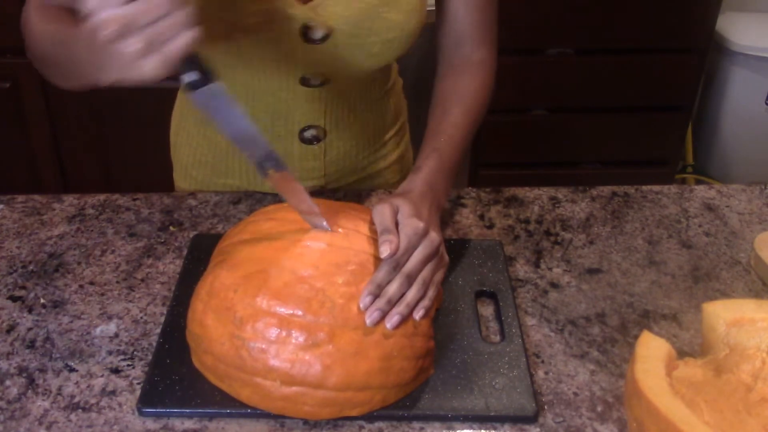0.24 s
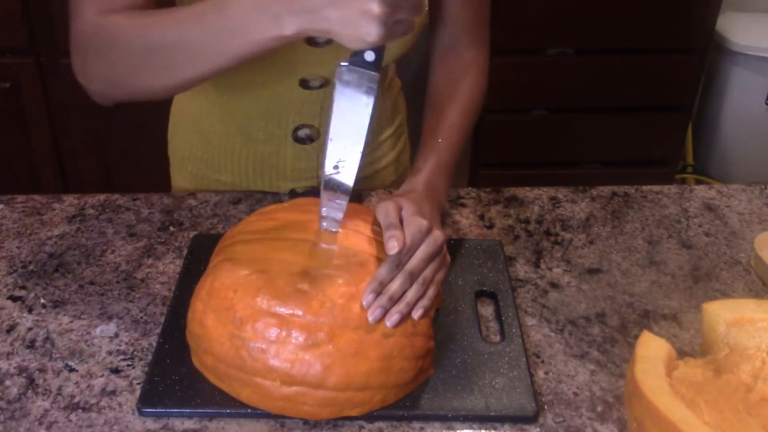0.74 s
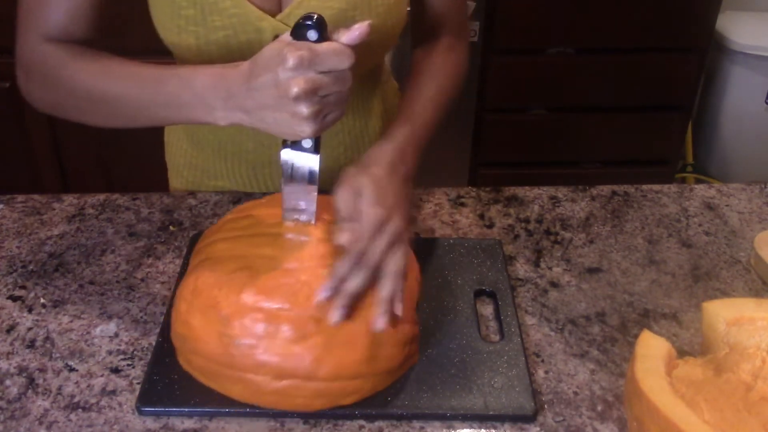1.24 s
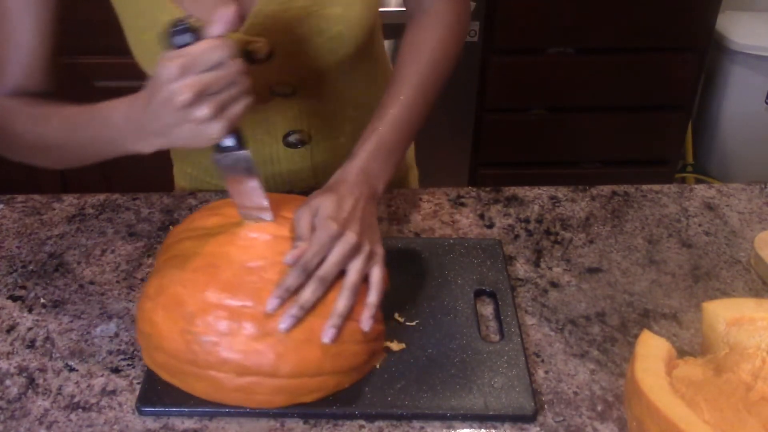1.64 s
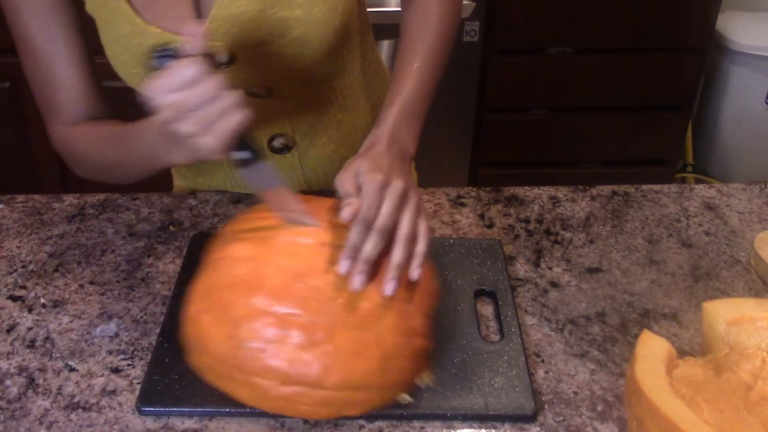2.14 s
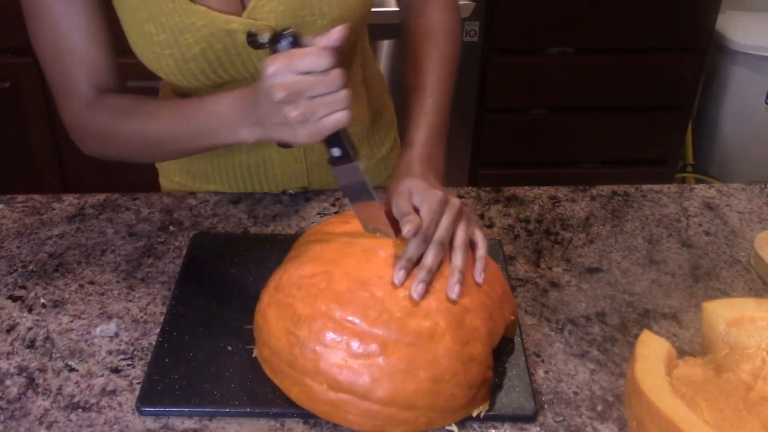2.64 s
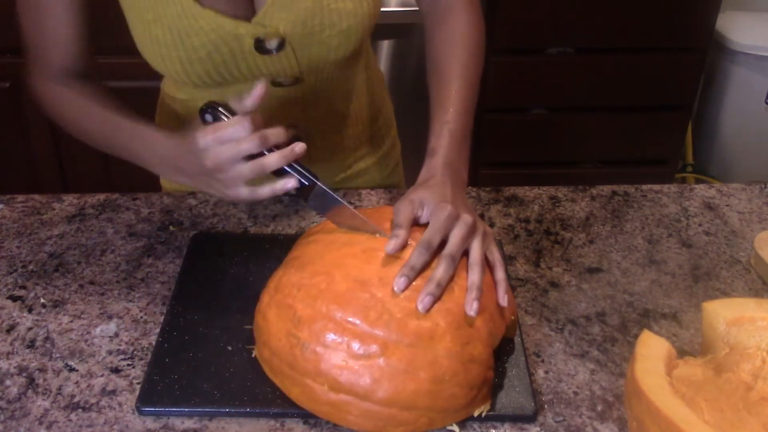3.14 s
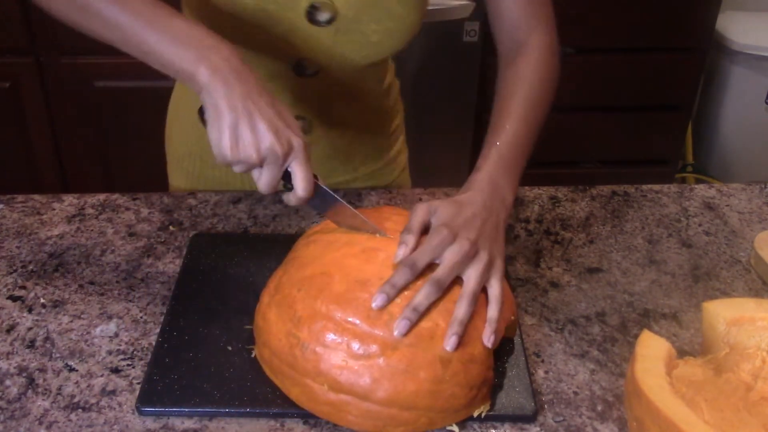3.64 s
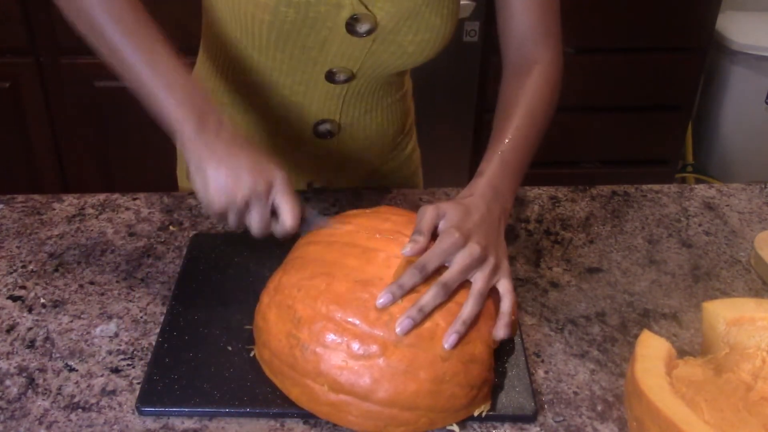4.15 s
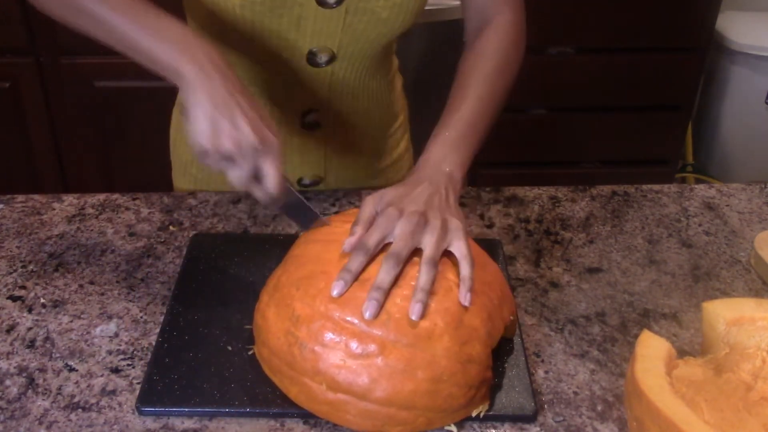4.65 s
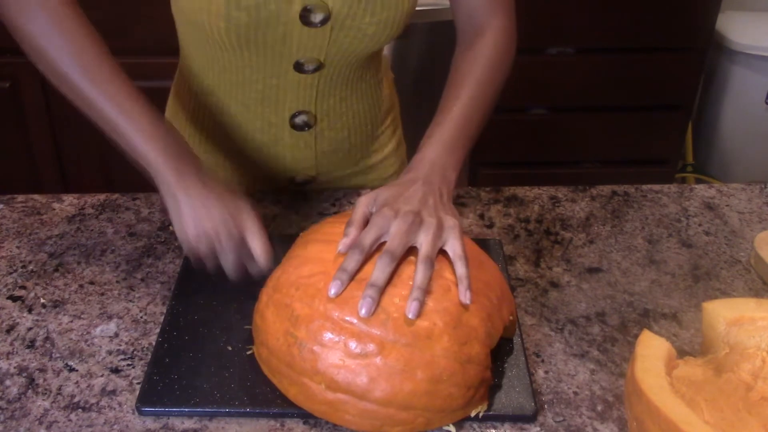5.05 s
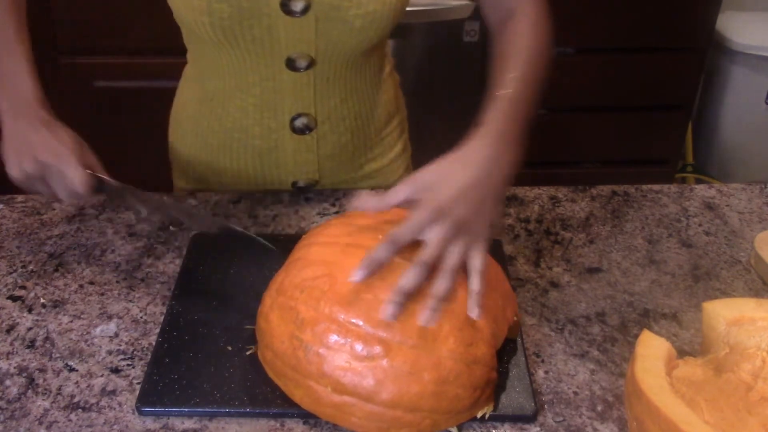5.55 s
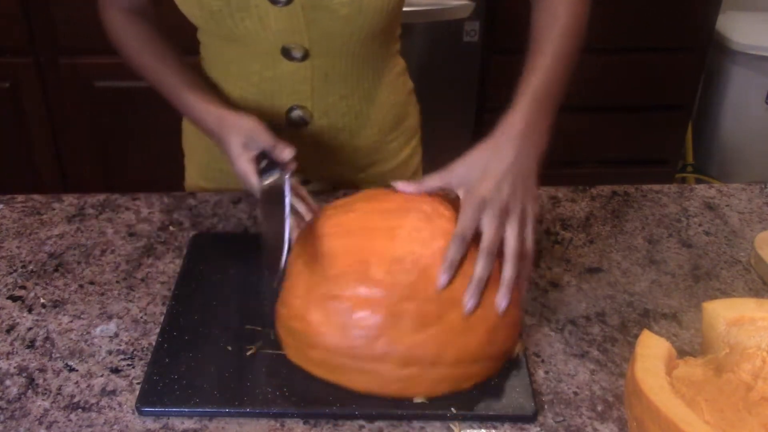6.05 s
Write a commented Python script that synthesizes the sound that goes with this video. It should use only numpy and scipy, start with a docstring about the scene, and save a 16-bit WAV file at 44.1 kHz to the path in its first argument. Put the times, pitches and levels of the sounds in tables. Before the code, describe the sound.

A large pumpkin is cut on a plastic board, heard close with short room echoes. Most strokes are faint, gritty crunches with low hollow rumbles and dry snaps. Three abrupt impacts stand far above them: a splitting thud early on, a clacky board knock past the middle, and a very loud bright crack shortly after. Gentle bumps, rubbing and a tip scrape fill the gaps over faint hum.

```python
"""Knife through a raw pumpkin

Close up in a kitchen, a chef's knife is forced through a raw pumpkin on a plastic board. Streams of random
grains make the flesh crunch and the slides rub; coloured noise bursts make fibres snap and rind crack.
Decaying sines ring the hollow shell, the knife on the board and the blade; one gliding tone squeaks.
Noise echoes and standing waves form the room, over air and hum; a limiter ducks the loudest hits."""
import sys
import numpy as np
from scipy import signal
from scipy.fft import rfft, irfft, next_fast_len
from scipy.io import wavfile

SR = 44100
rng = np.random.default_rng(int(sys.argv[2]) if len(sys.argv) > 2 else 0)


def transcribe(signal):
    """Save signal, clipped to [-1, 1], as a 16-bit WAV file at the path in sys.argv[1]."""
    frames = np.atleast_2d(signal).T
    limited = np.clip(frames, -1, 1)
    pcm = np.round(limited * 32767).astype(np.int16)
    wavfile.write(sys.argv[1], SR, pcm)


N = 277389
TIME = np.arange(N) / SR  # seconds

# Levels in all tables are those ahead of the echoes and the limiter.
# blade worked through the flesh: start t/s, end t/s, crunch level/dB, shell rumble level/dB
CUT_STROKES = [(0.02, 0.28, -49.5, -46.5), (0.43, 0.61, -57, -52), (0.93, 1.0, -54, -49.5),
               (1.42, 1.59, -56.5, -45.5), (1.61, 1.76, -50, -41.5), (2.62, 2.78, -53, -53),
               (2.80, 2.94, -48.5, -48), (3.15, 3.50, -69.5, -64.5), (3.73, 3.93, -58, -62),
               (3.95, 4.04, -49, -56), (4.14, 4.28, -59.5, -52), (4.88, 4.97, -50, -44.5),
               (5.40, 5.46, -51.5, -71)]
# rind gives way and the blade shoots forward: start t/s, end t/s, crunch level/dB, shell rumble level/dB
BLADE_LUNGES = [(0.789, 0.831, -36, -37.5), (4.063, 4.104, -30, -36.5), (4.984, 4.988, -23, -27)]
# pumpkin slid on the board: start t/s, end t/s, rubbing level/dB, shell rumble level/dB
PUMPKIN_SLIDES = [(1.95, 2.14, -47.5, -46), (2.16, 2.22, -43.5, -43), (3.45, 3.49, -60, -64),
                  (5.82, 6.02, -52.5, -49.5), (6.06, 6.29, -49.5, -51)]
# knife tip dragged over the board: start t/s, end t/s, level/dB
TIP_DRAG = (5.295, 5.336, -30)
# wet rind squeaking on steel in the first lunge: start t/s, end t/s, level/dB of the fundamental
RIND_SQUEAK = (0.808, 0.823, -34)
# knife hits the board: t/s, ring level/dB, splitting rind level/dB, lowpass f/Hz, shell thump level/dB,
# thump pitch f/Hz
BOARD_BLOWS = [(0.8329, -16, 5, 1896, -2.5, 281), (4.5043, -9.5, -15.5, 3340, -20.5, 268),
               (4.9872, -3.5, 5.5, 7550, -4, 343)]
# soft knocks on the shell: t/s, relative level/dB, contact click level/dB against the knock, pitch f/Hz
SHELL_KNOCKS = [(0.8627, -10.5, -20, 276), (0.879, -7, -20, 280), (1.25, -6.5, -17, 319),
                (1.274, -15, -20, 255), (1.596, -26.5, -22, 300), (1.667, -11.5, -15, 312),
                (1.729, -23.5, -5, 277), (2.154, -11.5, -7.5, 270), (2.169, -13, -33, 285),
                (3.167, -35, -20.5, 330), (3.821, -23, -40, 290), (4.087, -13, -40, 293),
                (4.273, -26, -5, 335), (4.414, -22, -40, 361), (4.426, -24.5, -37, 350),
                (4.446, -29, -35, 356), (5.397, -26, -13, 357), (5.622, -34, -31.5, 271.6),
                (5.817, -29.5, -36, 350), (6.063, -31.5, -11, 364)]
# loudest fibres snapping: t/s, relative level/dB, dull body level/dB against the snap
FIBRE_SNAPS = [(0.038, -30, -4), (0.076, -32.5, 4.5), (0.2648, -29, -3.5), (1.5937, -21, -38),
               (1.6522, -35, -8), (1.669, -33.5, 11), (1.7288, -31.5, 8), (1.7463, -30, -7),
               (2.1547, -39.5, 14), (2.209, -41.5, 10.5), (2.792, -27, 1), (2.8633, -29.5, -1.5),
               (2.898, -33, 6), (2.9097, -29.5, 0), (2.93, -32.5, 0), (3.8, -32.5, 6), (3.817, -25.5, -2),
               (4.061, -24, -18), (4.2714, -33.5, -11.5), (4.422, -34, -3), (5.456, -31.5, -2)]
# light pings of the blade: t/s, peak level/dB before decay
BLADE_PINGS = [(1.944, -42.5), (2.654, -41)]

# modes of the hollow shell (knocks shift the pitch): f/Hz, relative level/dB, t60/s
SHELL_MODES = [(168.4, -15, 0.0075), (225.7, -1, 0.022), (307.2, 12, 0.023), (365, -14, 0.01),
               (487, -8, 0.022)]
# modes of the knife on the board: f/Hz, relative level/dB, t60/s
BOARD_MODES = [(486, -8.5, 0.028), (614, -8.5, 0.051), (772, -9, 0.027), (1146, -19.5, 0.056),
               (1697, 0, 0.023), (1867, -1, 0.02), (2196, -8.5, 0.025), (3107, -5, 0.026),
               (3450, -3, 0.018), (4900, -26.5, 0.0093), (5830, -5.5, 0.014), (7340, -8, 0.01)]
# mode of the buried blade: f/Hz, relative level/dB, t60/s
SINGING_MODE = (3045, 0, 0.04)
# modes of the blade's heel tapping the rind: f/Hz, relative level/dB, t60/s
HEEL_MODES = [(565, -2.5, 0.025), (710, 2, 0.018), (1120, -0.5, 0.051), (2490, 0, 0.0093)]
# standing waves of the kitchen: f/Hz, level/dB, t60/s
ROOM_MODES = [(222, -64, .3), (289, -58, .42), (354, -55, .45), (398, -62, .35)]

# flesh tearing along the blade: f/Hz, relative level/dB per Hz
CRUNCH_SPECTRUM = [(150, -12.5), (500, 14), (1200, 2), (1700, 0), (3000, 0), (5000, -3), (8000, -1.5),
                   (10500, -7.5), (15000, -11)]
# cracking rind and flesh: f/Hz, relative level/dB per Hz
SPLIT_SPECTRUM = [(60, -38), (160, -19.5), (270, 8.5), (400, 5), (600, -8), (880, -2), (1100, -2.5),
                  (1500, 0.5), (2300, -0.5), (4000, -3), (8000, -7), (10500, -16), (15000, -24)]
# dry tick of a single fibre: f/Hz, relative level/dB per Hz
TICK_SPECTRUM = [(500, 0.5), (2000, -3.5), (5000, 4), (9000, 8), (12000, 0.5), (15000, -4)]
# pumpkin rubbing on the board: f/Hz, relative level/dB per Hz
SLIDE_SPECTRUM = [(150, -2), (500, 6), (1100, 3), (2100, 2), (3500, -7), (5500, -11), (8000, -8.5),
                  (11000, -19.5), (15000, -21)]
# tip scraping the board: f/Hz, relative level/dB per Hz
SCRAPE_SPECTRUM = [(260, -37), (450, -16), (699, -9), (871, 3.5), (1010, -3.5), (1390, 3.5), (1760, -2.5),
                   (1980, -8.5), (2500, -2), (3120, -15), (5870, -23), (15000, -37.5)]
# tone of the echoes: f/Hz, relative level/dB
ECHO_SPECTRUM = [(60, -1), (130, -11.5), (220, -4.5), (350, 2), (550, -3), (900, -6.5), (2000, -7.5),
                 (4000, -5.5), (7000, -11.5), (10000, -11.5), (15000, -8)]
# how much the two channels differ on the echoes: f/Hz, side level/dB
ECHO_WIDTH = [(60, -34.5), (250, -33), (1000, -28), (4000, -14.5), (8000, -21), (15000, -1)]
# kitchen reverberation: f/Hz, t60/s
ECHO_DECAY = [(150, 0.43), (400, 0.23), (1000, 0.48), (2800, 0.33), (7000, 0.37), (14000, 0.25)]
# room air: f/Hz, relative level/dB per Hz
AIR_SPECTRUM = [(25, 6), (60, -8.5), (130, -8), (250, -7), (430, -2), (650, -10.5), (870, -16.5),
                (1380, -18.5), (3500, -25), (8000, -29.5), (15500, -37)]
# each channel's own noise: f/Hz, relative level/dB per Hz
HISS_SPECTRUM = [(30, -17), (250, 3.5), (800, -2.5), (2000, -10.5), (6000, -21.5), (15000, -56)]
# appliance hum: f/Hz, rms level/dB
HUM_TONES = [(120.6, -72.5), (226, -64), (440, -74), (635, -65), (655, -62.5)]

# swell and die-away of each kind of movement, in dB per second
STROKE_RISE, STROKE_FALL = 253, 286.5
LUNGE_RISE, LUNGE_FALL = 601, 739.5
SLIDE_RISE, SLIDE_FALL = 199, 170
DRAG_RISE, DRAG_FALL = 159, 194
SQUEAK_EDGE = 913


def from_db(db):
    """Turns decibels into gain."""
    return 10 ** (np.asarray(db) / 20)


def rms_one(x):
    """Brings a sound to an rms of 1."""
    return x / np.sqrt(np.mean(x ** 2) + 1e-20)


def at_hz(points, hz):
    """Reads a table on a log-frequency axis."""
    table_hz, values = np.transpose(points)
    return np.interp(np.log(np.maximum(hz, 1)), np.log(table_hz), values)


def colour(x, spectrum):
    """Gives a sound a smooth spectral tilt."""
    size = next_fast_len(len(x))
    gain = from_db(at_hz(spectrum, np.fft.rfftfreq(size, 1 / SR)))
    return irfft(rfft(x, size) * gain, size)[:len(x)]


def butter(x, hz, kind, order=2):
    """Runs a sound through a Butterworth filter."""
    sos = signal.butter(order, np.clip(hz, 10, .45 * SR), kind, fs=SR, output="sos")
    return signal.sosfilt(sos, x)


def add(out, s, sound):
    """Mixes a sound in at time s."""
    start = max(round(s * SR), 0)
    out[start:start + len(sound)] += sound[:N - start]


def ringing(modes, t):
    """Decaying sines of a struck body, in alternating polarity."""
    wave = 0
    for k, (hz, db, t60) in enumerate(modes):
        wave = wave + (-1) ** k * from_db(db - 60 * t / t60) * np.sin(2 * np.pi * hz * t)
    return wave


def driven(modes, force):
    """A body kept ringing by a running force; rms 1."""
    return rms_one(signal.oaconvolve(force, ringing(modes, TIME[:SR // 5]))[:N])


def burst(spectrum, t60):
    """A crack: decaying noise, flattened in spectrum, coloured and cut off at t60."""
    t = TIME[:SR // 6]
    decay = from_db(-60 * t / t60)
    bins = rfft(rng.standard_normal(len(t)) * decay)
    flat = irfft(bins / np.abs(bins), len(t))
    crack = colour(flat, spectrum) * (t < t60)
    return crack * np.linalg.norm(decay) / np.linalg.norm(crack)


def grains(per_s, spread_db, clump_db):
    """Tiny ruptures at random moments, few large among many small, their strength drifting in clumps."""
    knots = TIME[::SR // 100]
    clumps = np.interp(TIME, knots, np.clip(rng.standard_normal(len(knots)), -1.5, 1.5))
    sizes = from_db(spread_db * np.minimum(rng.exponential(1, N), 3.5) + clump_db * clumps)
    return sizes * rng.choice([-1, 1], N) * (rng.random(N) < per_s / SR)


def gesture(start, end, db, rise_db_per_s, fall_db_per_s):
    """Gain of one movement: it swells up to its start, holds, and dies away after its end."""
    below = rise_db_per_s * np.maximum(start - TIME, 0) + fall_db_per_s * np.maximum(TIME - end, 0)
    return from_db(db - np.minimum(below, 120))


def gestures(rows, rise_db_per_s, fall_db_per_s):
    """Gains at the contact and in the shell for a run of movements; the strongest one leads."""
    contact = shell = 0
    for start, end, contact_db, shell_db in rows:
        shape = gesture(start, end, 0, rise_db_per_s, fall_db_per_s)
        contact = np.maximum(contact, from_db(contact_db) * shape)
        shell = np.maximum(shell, from_db(shell_db) * shape)
    return contact, shell


def background(air_db=-52.5, hiss_db=-62.0):
    """Room air as coloured noise, appliance hum as steady sines, and a faint hiss of each channel's own."""
    air = from_db(air_db) * rms_one(colour(rng.standard_normal(N), AIR_SPECTRUM))
    hum = 0
    for hz, rms_db in HUM_TONES:
        hum = hum + np.sqrt(2) * from_db(rms_db) * np.sin(2 * np.pi * (hz * TIME + rng.random()))
    hiss = np.array([rms_one(colour(white, HISS_SPECTRUM)) for white in rng.standard_normal((2, N))])
    return air + hum + from_db(hiss_db) * hiss


def strokes(rushing, shell_rumble, fibres_per_s=60, fibres_db=-7.5, buried_s=4.1, singing_db=-6):
    """Small slips crunch at the blade and rumble the shell; fibres jolt the knife; the buried blade sings."""
    gain, shell_gain = gestures(CUT_STROKES, STROKE_RISE, STROKE_FALL)
    tearing = grains(per_s=3000, spread_db=4.5, clump_db=2.5)
    breaking = grains(fibres_per_s, spread_db=0, clump_db=-1)
    crunch = rms_one(colour(tearing, CRUNCH_SPECTRUM))
    # levels of fibres and singing are relative to the crunch
    fibres = from_db(fibres_db) * driven(BOARD_MODES, breaking)
    singing = from_db(singing_db) * (TIME > buried_s) * driven([SINGING_MODE], rushing)
    return gain * (crunch + fibres + singing) + shell_gain * shell_rumble


def kitchen(x, first_echo_s=0.0019):
    """Diffuse echoes: bands of noise that fade in after the first echo and die at their own rates."""
    t = TIME[:SR * 3 // 4]
    tail = 0
    edges = np.geomspace(40, 18000, 10)  # band edges in Hz
    for low, high in zip(edges, edges[1:]):
        band = butter(rng.standard_normal(len(t)), [low, high], "band")
        tail = tail + band * from_db(-60 * t / at_hz(ECHO_DECAY, np.sqrt(low * high)))
    tail = tail * np.clip(t / first_echo_s - 1, 0, 1)
    return signal.oaconvolve(x, colour(tail / np.linalg.norm(tail), ECHO_SPECTRUM))[:N]


def snaps(snap_db=-6.5, snap_t60=0.017, body_db=-6.0, body_t60=0.029, body_hz=2600, steel_db=-12.0):
    """Single fibres break with a dry tick and a duller crack in the flesh, and jolt the knife."""
    out = np.zeros(N)
    steel = from_db(steel_db) * ringing(BOARD_MODES, TIME[:SR // 6])
    for s, db, dull_db in FIBRE_SNAPS:
        tick = from_db(snap_db) * burst(TICK_SPECTRUM, snap_t60)
        flesh = from_db(body_db) * butter(burst(SPLIT_SPECTRUM, body_t60), body_hz, "low")
        add(out, s, from_db(db) * (tick + from_db(dull_db) * (flesh + steel)))
    return out


def lunges(rushing, shell_rumble):
    """The blade shoots forward: its slips come denser than in a stroke and rumble the shell."""
    gain, shell_gain = gestures(BLADE_LUNGES, LUNGE_RISE, LUNGE_FALL)
    return gain * rms_one(colour(rushing, CRUNCH_SPECTRUM)) + shell_gain * shell_rumble


def squeak(start_hz=2950, rise_hz_per_s=27000, rate_waver=.05, overtone_db=-3.0):
    """Stick and slip quicken as the blade accelerates, unsteady in rate and in strength."""
    waver, grip = [rms_one(butter(white, 400, "low")) for white in rng.standard_normal((2, N))]
    hz = (start_hz + rise_hz_per_s * (TIME - RIND_SQUEAK[0])) * (1 + rate_waver * waver)
    phase = 2 * np.pi * np.cumsum(hz) / SR
    tone = sum(from_db(overtone_db * k) * np.sin((k + 1) * phase) for k in np.arange(4))
    return gesture(*RIND_SQUEAK, SQUEAK_EDGE, SQUEAK_EDGE) * from_db(3 * grip) * tone


def thump(pitch_hz, reference_hz=288, deepest_hz=150, contact_hz=650):
    """A soft push rings the shell, higher where held tighter; too small for deep bass. Peak 1."""
    modes = [(hz * pitch_hz / reference_hz, db, t60) for hz, db, t60 in SHELL_MODES]
    soft = butter(ringing(modes, TIME[:SR // 6]), contact_hz, "low")
    wave = butter(soft, deepest_hz, "high")
    return wave / np.abs(wave).max()


def blows(crack_t60=0.037, tear_t60=.1, tear_db=-4.5):
    """The rind cracks and tears on for a moment, the blade lands on the board and the shell is jolted."""
    out = np.zeros(N)
    for s, ring_db, split_db, bright_hz, thump_db, pitch_hz in BOARD_BLOWS:
        tear = from_db(tear_db) * burst(SPLIT_SPECTRUM, tear_t60)
        split = burst(SPLIT_SPECTRUM, crack_t60) + tear
        hit = from_db(ring_db) * ringing(BOARD_MODES, TIME[:SR // 6]) + from_db(split_db) * split
        add(out, s, butter(hit, bright_hz, "low") + from_db(thump_db) * thump(pitch_hz))
    return out


def knocks(shell_db=-3.5, click_hz=1600, click_t60=0.017):
    """Hand and handle bump the pumpkin and rock it on the board: a shell thump with a dull contact click."""
    out = np.zeros(N)
    for s, db, contact_db, pitch_hz in SHELL_KNOCKS:
        click = butter(burst(SPLIT_SPECTRUM, click_t60), click_hz, "low", order=3)
        knock = from_db(shell_db) * thump(pitch_hz) + from_db(contact_db) * click
        add(out, s, from_db(db) * knock)
    return out


def pings(blade_hz=6550, blade_t60=0.038):
    """Now and then the steel pings: one high decaying mode."""
    out = np.zeros(N)
    for s, db in BLADE_PINGS:
        add(out, s, ringing([(blade_hz, db, blade_t60)], TIME[:SR // 5]))
    return out


def slides(shell_rumble):
    """The pumpkin slips over the board in tiny jerks that rub at the contact and rumble the shell."""
    gain, shell_gain = gestures(PUMPKIN_SLIDES, SLIDE_RISE, SLIDE_FALL)
    rubbing = grains(per_s=4000, spread_db=3, clump_db=2.5)
    return gain * rms_one(colour(rubbing, SLIDE_SPECTRUM)) + shell_gain * shell_rumble


def heel_tap(tap_s=4.2725, tap_db=-29):
    """The heel of the blade taps the rind once and rings briefly."""
    out = np.zeros(N)
    add(out, tap_s, from_db(tap_db) * ringing(HEEL_MODES, TIME[:SR // 5]))
    return out


def tip_scrape():
    """The knife tip catches and slips across the board in sparser grains."""
    scraping = grains(per_s=1200, spread_db=2.5, clump_db=2.5)
    return gesture(*TIP_DRAG, DRAG_RISE, DRAG_FALL) * rms_one(colour(scraping, SCRAPE_SPECTRUM))


def scene(room_db=-0.5, first_channel_db=.3):
    """Board sounds sit near the centre, a touch stronger in the first channel; the echoes are slightly wide."""
    # one dense stream of slips drives the lunges, the shell and the singing blade
    rushing = grains(per_s=12000, spread_db=3, clump_db=1.5)
    shell_rumble = driven(SHELL_MODES, rushing)
    direct = strokes(rushing, shell_rumble) + snaps() + lunges(rushing, shell_rumble) + squeak()
    direct = direct + blows() + knocks() + pings() + slides(shell_rumble) + heel_tap() + tip_scrape()
    boom = signal.oaconvolve(direct, ringing(ROOM_MODES, TIME[:SR]))[:N]
    middle = direct + boom + from_db(room_db) * kitchen(direct)
    side = colour(kitchen(direct), ECHO_WIDTH)
    return np.array([from_db(first_channel_db) * (middle + side), middle - side]) + background()


def record(dry, limit_db=3.0, release_db_per_s=140, attack_s=0.00019, low_cut_hz=90, cutoff_hz=15900):
    """A limiter ducks after the loudest peaks, whose first cycles clip; deep bass and the top are cut."""
    over = np.maximum(20 * np.log10(np.abs(dry).max(axis=0) + 1e-9) - limit_db, 0)
    # the gain reduction jumps up with each peak and recovers at a steady rate
    held = np.maximum.accumulate(over + release_db_per_s * TIME) - release_db_per_s * TIME
    r = np.exp(-1 / (attack_s * SR))
    reduction_db = signal.lfilter([1 - r], [1, -r], held)
    limited = np.clip(dry * from_db(-reduction_db), -.84, .84)
    bass_cut = butter(limited, low_cut_hz, "high", order=3)
    return signal.sosfilt(signal.ellip(10, .1, 80, cutoff_hz, fs=SR, output="sos"), bass_cut)


dry = scene()
out = record(dry)
transcribe(out)
```